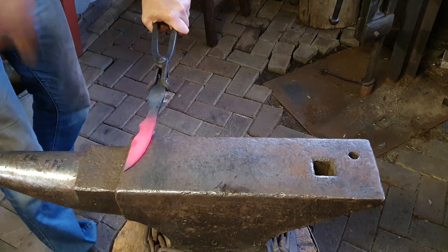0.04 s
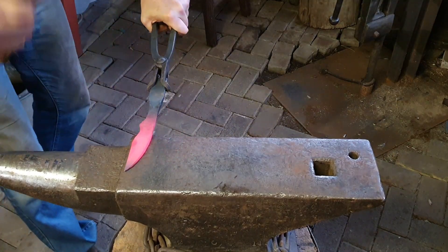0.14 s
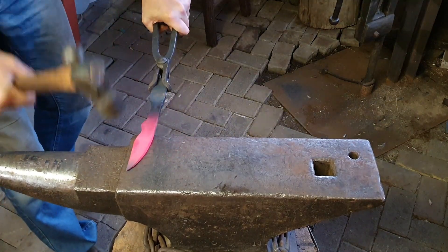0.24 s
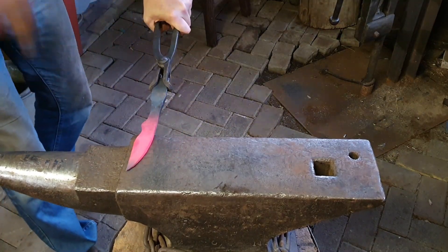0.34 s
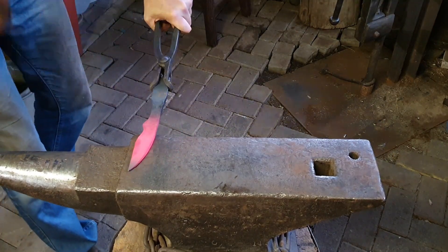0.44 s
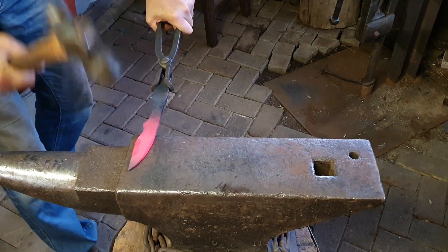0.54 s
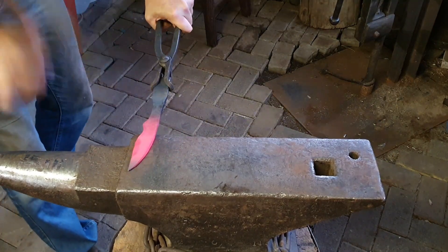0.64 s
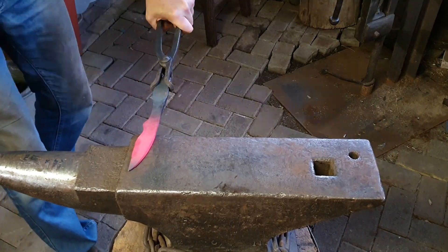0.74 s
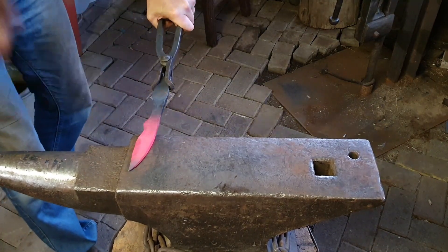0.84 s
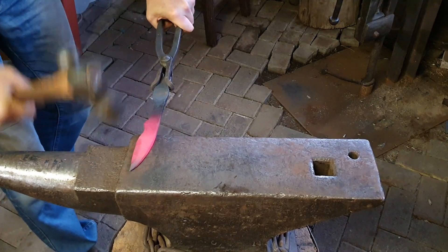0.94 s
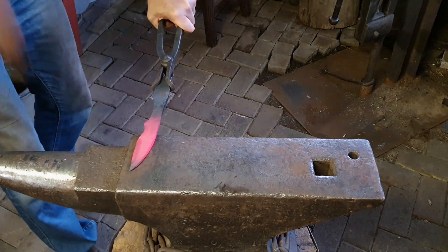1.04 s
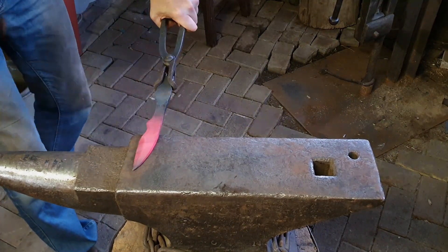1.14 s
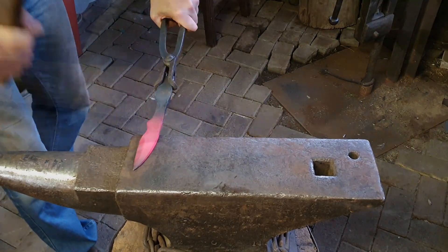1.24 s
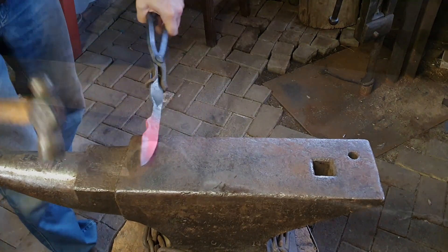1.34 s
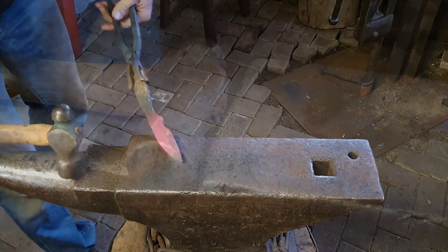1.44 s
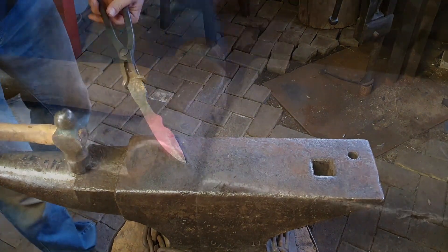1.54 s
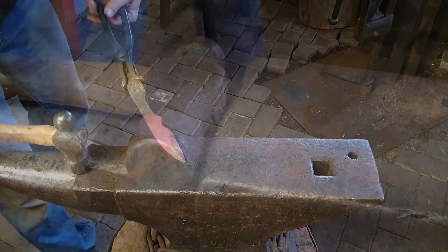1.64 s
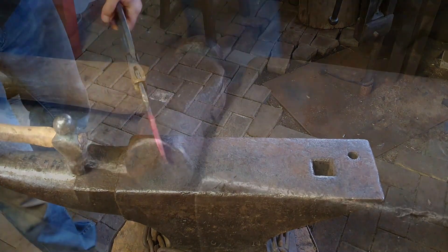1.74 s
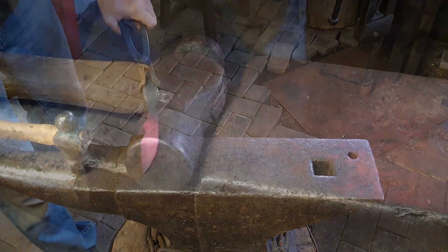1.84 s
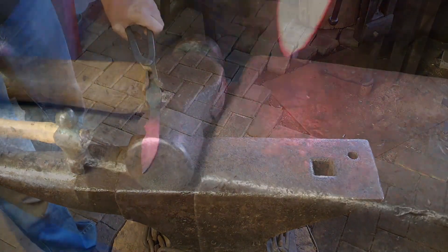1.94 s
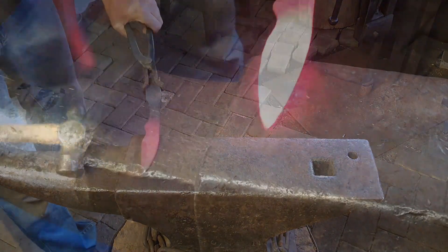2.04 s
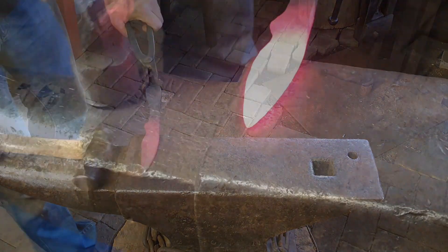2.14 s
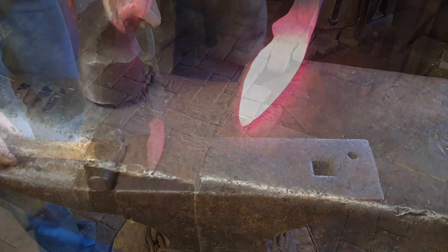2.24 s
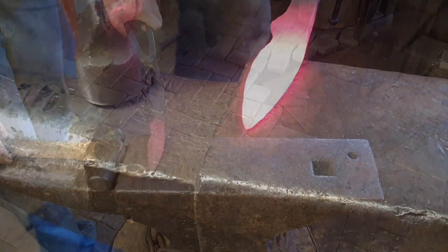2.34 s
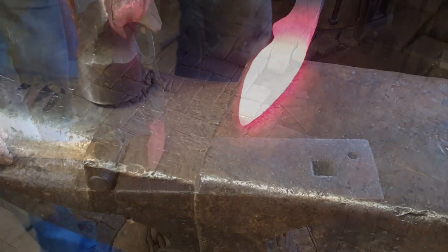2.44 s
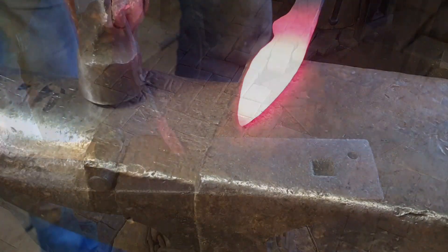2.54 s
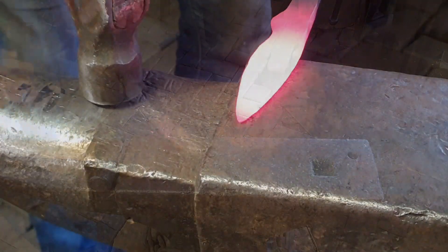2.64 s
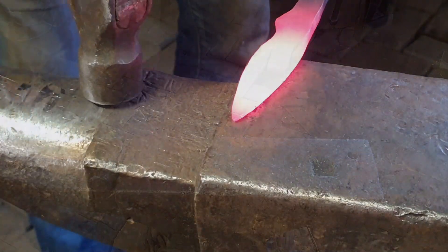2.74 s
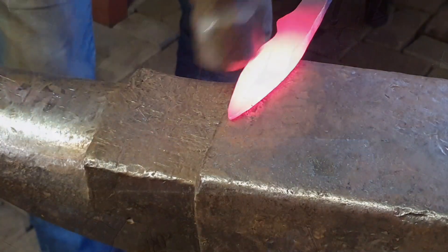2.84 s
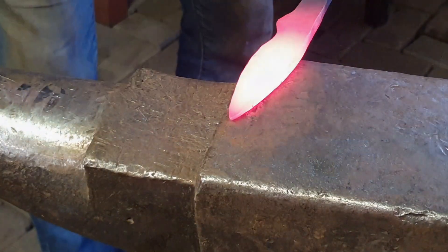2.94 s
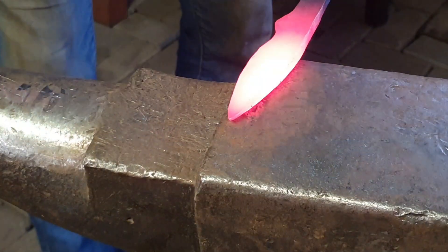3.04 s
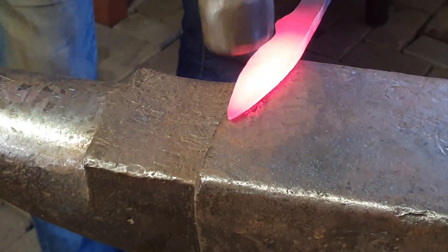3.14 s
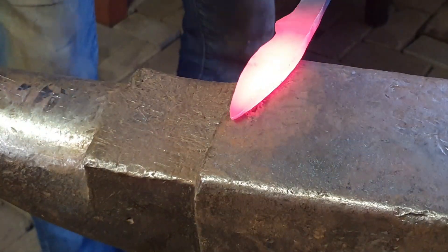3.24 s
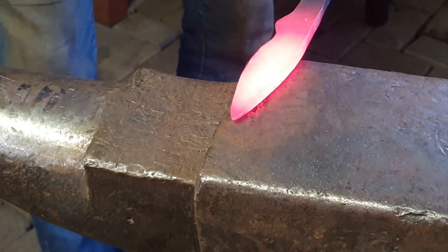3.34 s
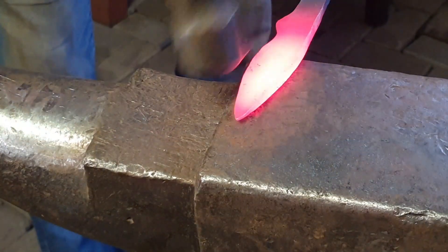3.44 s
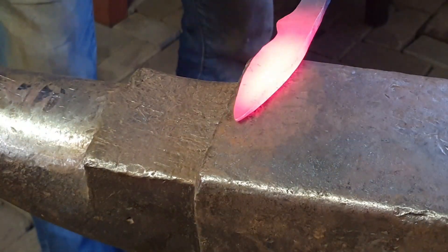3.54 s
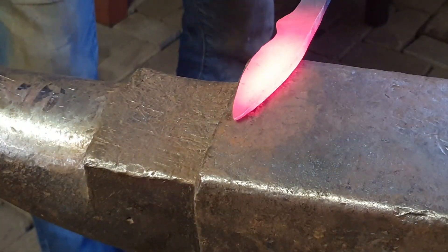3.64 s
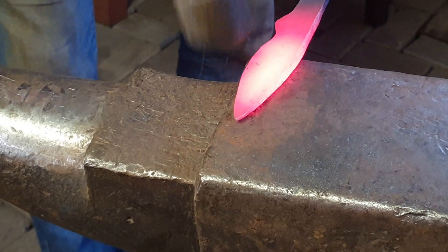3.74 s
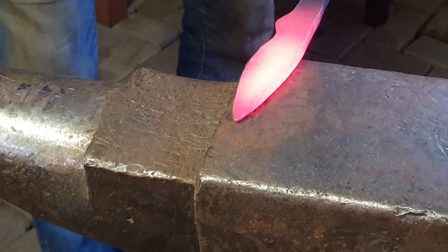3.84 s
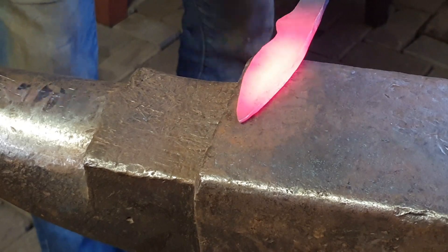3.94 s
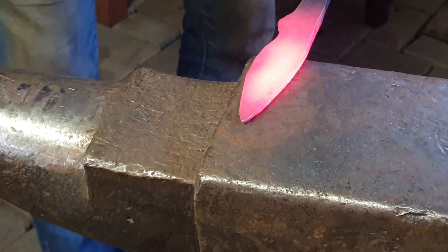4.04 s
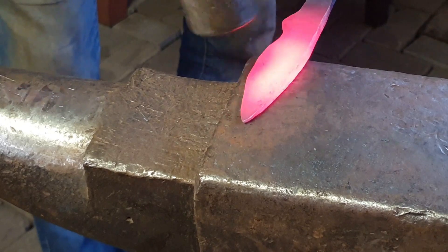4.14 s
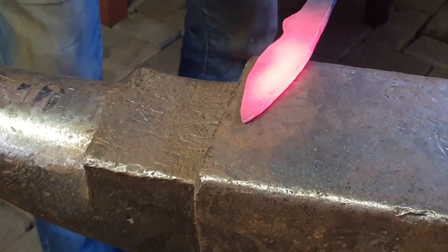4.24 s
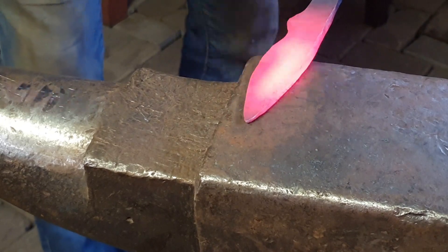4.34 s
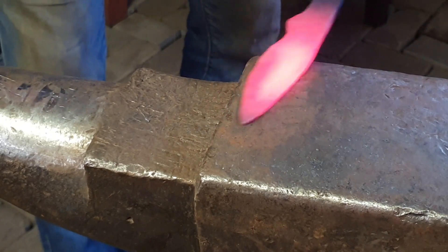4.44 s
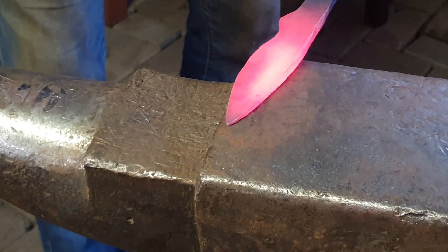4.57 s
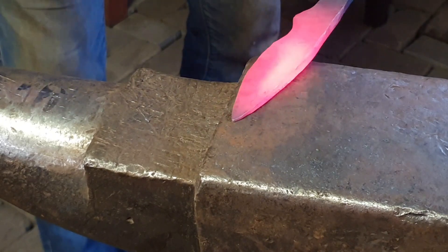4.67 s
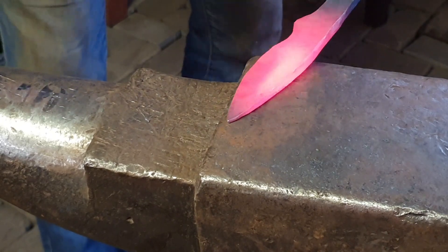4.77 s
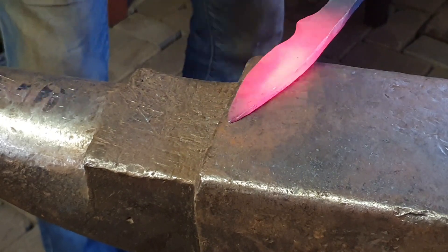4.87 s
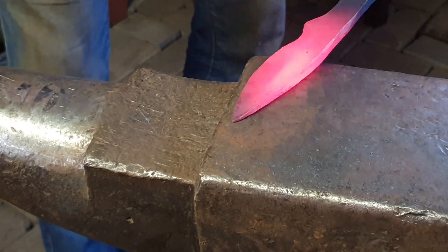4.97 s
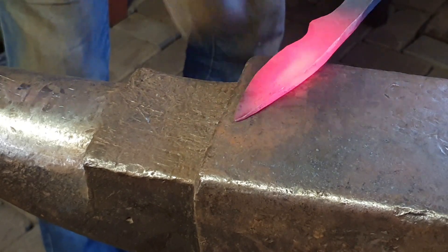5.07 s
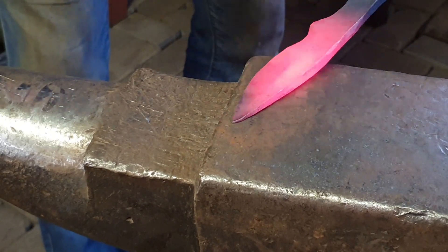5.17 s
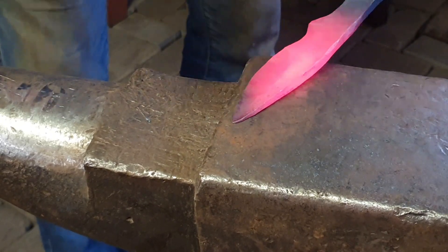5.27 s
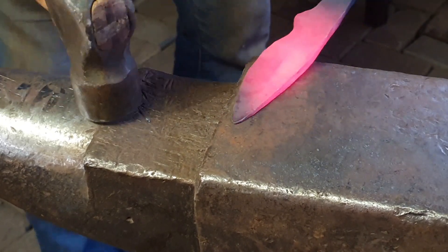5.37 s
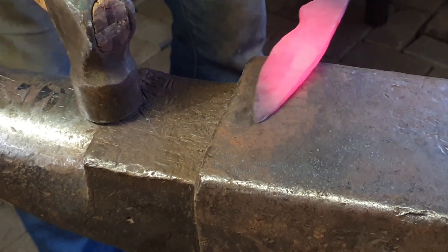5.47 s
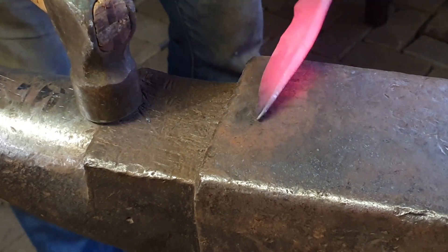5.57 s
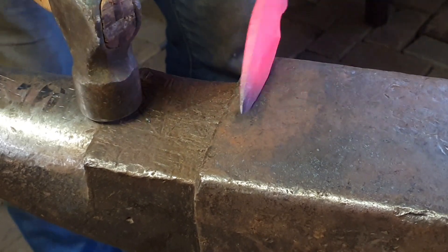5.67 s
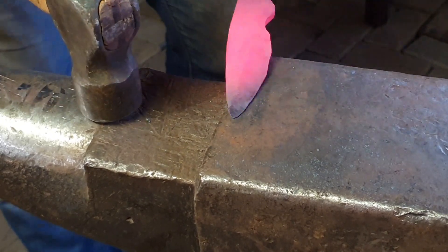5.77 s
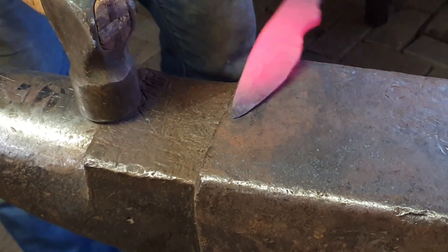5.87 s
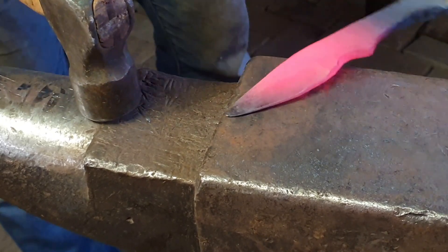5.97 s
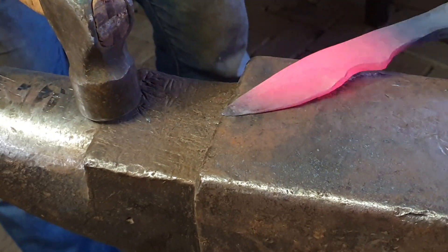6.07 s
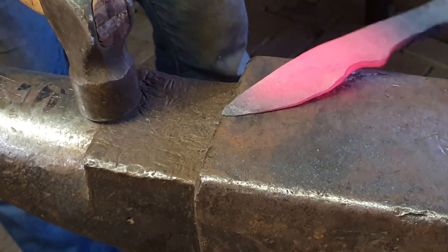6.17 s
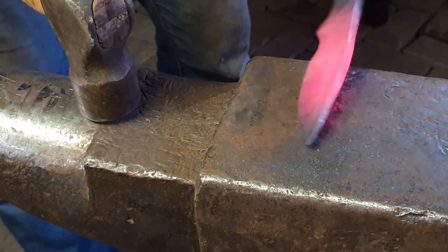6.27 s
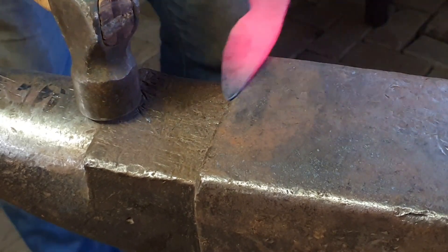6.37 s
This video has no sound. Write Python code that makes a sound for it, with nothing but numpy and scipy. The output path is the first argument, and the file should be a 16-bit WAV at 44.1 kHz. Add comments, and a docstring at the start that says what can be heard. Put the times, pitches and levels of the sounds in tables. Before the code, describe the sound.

A steady forge drone with faint hiss fills a small workshop. In front, fast regular hammer blows clang on an anvil, sharp and quickly damped. They pause for soft metallic taps and clinks as tools are set down, resume in a long burst and a short one, then end with a ringing tap and a very faint one. The stereo pickup is close and automatically levelled, so the fire dips behind the hammering.

```python
"""A forge drones from the start, noise roaring and hissing through narrow resonances over a low rumble.
A smith draws out a hot blade on an anvil in a burst of hammer blows: each swells as noise, cracks as a pulse,
thuds as a band-passed push and leaves decaying sine modes ringing. Hammer and tongs are set down with light
taps and clinks, two more bursts follow close together, then two last taps.
A low hum swells at the end. An automatic gain control ducks the forge under each burst."""
import sys
import numpy as np
from scipy import signal
from scipy.fft import rfft, irfft, next_fast_len
from scipy.io import wavfile
from scipy.ndimage import uniform_filter1d, minimum_filter1d, map_coordinates

SR = 44100
rng = np.random.default_rng(int(sys.argv[2]) if len(sys.argv) > 2 else 0)


def generate_wav(signal):
    """Clip the signal to [-1, 1] and save it as 16-bit WAV at the path in sys.argv[1]."""
    frames = np.transpose(np.atleast_2d(signal))
    scaled = np.clip(frames, -1, 1) * 32767
    pcm = np.round(scaled).astype(np.int16)
    wavfile.write(sys.argv[1], SR, pcm)


N = 282681
TIME = np.arange(N) / SR
LEAD = SR // 20  # samples of a stroke before its contact
AGE = (np.arange(SR // 3) - LEAD) / SR  # seconds since contact

# stereo placing of the forge, positive to the left: pitch_hz [Hz], pan_db [dB left over right]
FORGE_PAN = [(60, 0), (110, 0.5), (200, 1.5), (380, 3), (700, 2.5), (1290, 7), (2380, 2), (4400, 17),
             (8120, 3.5), (15000, -4.5)]
# stereo placing of blows and taps, positive to the left: pitch_hz [Hz], pan_db [dB left over right]
BLOW_PAN = [(200, 2.5), (700, 4), (2400, 4.5), (4400, 6), (6300, 7.5), (7600, 0), (12000, 0.5),
            (15000, 3.5)]
# the anvil's two lasting notes, low then high:
# pitch_hz [Hz], level_db [dB], t60_s [s], pan_db [dB left over right], bloom_db [dB]
NOTES = [(1454, -3, .135, 2.5, 4), (3004, 12.5, .135, .7, 14)]


def amp(db):
    """Decibels to gain."""
    return 10 ** (np.asarray(db) / 20)


def unit(x):
    """Scale to rms 1."""
    return x / np.sqrt(np.mean(x ** 2) + 1e-20)


def along(points, hz):
    """Read a curve of (Hz, value) points on a log frequency axis."""
    point_hz, value = np.transpose(points)
    return np.interp(np.log(hz + 1), np.log(point_hz + 1), value)


def curves(rows):
    """One value per sample for each column after the time."""
    s, *columns = np.transpose(rows)
    return [np.interp(TIME, s, column) for column in columns]


def pan(db):
    """Left and right gains of constant power, left over right by db."""
    gains = amp(np.array([db, -db]).reshape(2, -1) / 2)
    return gains / np.sqrt(np.mean(gains ** 2, axis=0))


def wobble(rate, size):
    """A smooth random curve for each ear, through rate random knots a second."""
    at = np.arange(size) * rate / SR
    knots = rng.standard_normal((2, 512))
    return np.array([map_coordinates(ear, [at], mode="wrap") for ear in knots])


def noise(spectrum, balance, size):
    """Stereo noise of rms 1, alike in the bass and diffuse in the treble."""
    # how alike the two ears are: pitch_hz [Hz], likeness [0-1]
    alike = [(60, .92), (130, 0.57), (290, 0.65), (640, 0.22), (1400, 0.0083)]
    m = next_fast_len(size)
    hz = np.fft.rfftfreq(m, 1 / SR)
    turn = np.arccos(np.clip(along(alike, hz), -1, 1)) / 2
    mid, side = rfft(rng.standard_normal((2, m))) * [np.cos(turn), np.sin(turn)]
    ears = np.array([mid + side, mid - side])
    shaped = ears * amp(along(spectrum, hz)) * pan(along(balance, hz))
    return unit(irfft(shaped, m)[:, :size])


def resonance(hz, width):
    """Noise ringing in one narrow resonance, 12 dB down at width Hz either side."""
    peak = [(max(hz - 4 * width, 1), -80), (hz - width, -12), (hz, 0), (hz + width, -12), (hz + 4 * width, -80)]
    return noise(peak, FORGE_PAN, N)


def workshop(x, wet=0.96, t60=0.17):
    """The workshop's standing waves comb a steady sound into fine fixed peaks."""
    t = np.arange(SR // 4) / SR
    tail = rng.standard_normal((2, len(t))) * amp(-60 * t / t60)
    tail /= np.linalg.norm(tail, axis=1, keepdims=True)
    highpass = signal.butter(2, 600, "highpass", fs=SR, output="sos")
    above = signal.sosfilt(highpass, x)
    return unit(x + wet * signal.fftconvolve(above, tail, axes=1)[:, :N])


def forge():
    """The fire roars steadily through the burner's resonances and hisses."""
    # strength of the fire: start_s [s], level_db [dB over usual]
    fire = [(0, 4.5), (.5, 0.5), (1.9, 1), (2.4, -1.5), (3.2, 0.5), (4.2, 3.5), (5.5, 2.5), (6.41, 1.5)]
    # the broad roar: pitch_hz [Hz], level_db [dB per Hz, relative]
    roar_spectrum = [(76, -50.5), (130, -17.5), (176, -12), (274, -11.5), (376, 0), (500, -11),
                     (553, -22.5), (686, -15.5), (758, -23.5), (967, -24), (1620, -34), (1870, -34.5),
                     (2190, -38.5), (2460, -34.5), (4000, -50.5), (5200, -89.5), (8800, -120)]
    # the treble hiss: pitch_hz [Hz], level_db [dB per Hz, relative]
    hiss_spectrum = [(1500, -0.5), (3000, 4.5), (4300, 7), (5000, 3.5), (6300, 5.5), (7300, -13.5),
                     (8600, -9.5), (9600, 3.5), (11400, -4), (12500, -16), (15500, -26.5)]
    # resonances of the burner: pitch_hz [Hz], width_hz [Hz], level_db [dB over the broad roar]
    flue = [(242.5, 28, -12.5), (357, 90, -5.5), (437.4, 21, -10), (581, 26, -20), (720, 20, -25)]
    roar_db, hiss_db = -40, -73  # at usual strength
    drone_db = -6  # the lowest resonance, over the roar

    fire_db, = curves(fire)
    roar = noise(roar_spectrum, FORGE_PAN, N)
    roar = roar + sum(amp(db) * resonance(hz, width) for hz, width, db in flue)
    roar = workshop(roar) + amp(drone_db) * resonance(hz=185.1, width=30)
    hiss = workshop(noise(hiss_spectrum, FORGE_PAN, N))
    return amp(fire_db) * (amp(roar_db) * roar + amp(hiss_db) * hiss)


def hum(hz=60.28, purity=.93):
    """The fire's low rumble, which gathers into one wavering tone as it swells."""
    # the draught: start_s [s], level_db [dB]
    draught = [(0, -35.5), (.35, -36), (1.25, -35), (1.55, -44.5), (1.9, -40.5), (2.45, -44), (2.7, -40.5),
               (3.4, -40.5), (4.3, -36), (5.55, -42.5), (6.0, -41), (6.37, -23.5)]
    # the rumble: pitch_hz [Hz], level_db [dB per Hz, relative]
    rumble_spectrum = [(13, -46), (22, -17), (48, -6), (65, 5), (83, -1), (118, -12), (129, -30),
                       (140, -20.5), (180, -58), (310, -120)]
    from_db, full_db = -36.5, -29  # draught levels where the tone starts to gather and takes over

    draught_db, = curves(draught)
    gathered = np.clip((draught_db - from_db) / (full_db - from_db), 0, 1)
    share = np.clip(purity, 0, 1) * gathered
    tone = np.sqrt(2) * np.sin(2 * np.pi * hz * TIME + 0.34 * wobble(6.6, N)[0])
    rumble = noise(rumble_spectrum, FORGE_PAN, N)
    # level the noise, so the draught alone sets its slow swells
    power = np.abs(uniform_filter1d(np.mean(rumble ** 2, axis=0), SR // 6))
    rumble /= np.sqrt(power)
    return amp(draught_db) * (np.sqrt(share) * tone + np.sqrt(1 - share) * rumble)


def add(track, s, stroke):
    """Mix a stroke in with its contact at s."""
    start = max(round(s * SR) - LEAD, 0)
    part = track[:, start:start + len(AGE)]
    part += stroke[:, :part.shape[1]]


def swell(rise, t60, curve=2.8):
    """Climbs the last 20 dB in rise seconds, then dies away from the contact on."""
    climb_db = -20 * (np.maximum(-AGE, 0) / rise) ** curve
    decay_db = -60 * np.maximum(AGE, 0) / t60
    return amp(climb_db + decay_db)


def tilt(spectrum, bright_db):
    """Lifts the treble of a contact: the share of bright_db applied grows with frequency."""
    share = [(2500, 0.032), (9000, 0.62)]
    return [(hz, db + bright_db * along(share, hz)) for hz, db in spectrum]


def clash(spectrum, split_hz=5000):
    """Dense bright noise swells up to the contact, then dies away, treble first."""
    dense = noise(spectrum, BLOW_PAN, len(AGE))
    lowpass = signal.butter(2, split_hz, fs=SR, output="sos")
    body = signal.sosfiltfilt(lowpass, dense)
    treble = dense - body
    return body * swell(rise=0.023, t60=0.077, curve=2.7) + treble * swell(rise=0.023, t60=0.061, curve=2.6)


def click(spectrum, size=1024):
    """The causal (minimum-phase) pulse of unit energy that has this spectrum."""
    hz = np.fft.rfftfreq(size, 1 / SR)
    cepstrum = irfft(np.log(amp(along(spectrum, hz))))
    # fold the backward half onto the forward half
    cepstrum[1:size // 2] *= 2
    cepstrum[size // 2 + 1:] = 0
    pulse = irfft(np.exp(rfft(cepstrum)))
    return pulse / np.linalg.norm(pulse)


def crack(spectrum):
    """The hammer face lands: one sharp pulse and a few milliseconds of crushed scale."""
    scale = noise([(100, 0.0088), (15000, 0.0057)], BLOW_PAN, len(AGE))  # nearly white
    force = scale * (AGE >= 0) * amp(-60 * np.abs(AGE) / .014)
    force[:, LEAD] += 2.7 * pan(6.8)[:, 0]
    return signal.fftconvolve(force, click(spectrum)[None], axes=1)[:, :len(AGE)]


def thud(low_hz=250, high_hz=460):
    """The block takes the blow with a damped low push."""
    block = signal.butter(2, [low_hz, high_hz], "bandpass", fs=SR, output="sos")
    push = signal.sosfilt(block, np.exp(-((AGE - .0008) / 0.00045) ** 2))
    return pan(1.2) * push / np.abs(push).max()


def low_tail():
    """A short tail of low noise that starts with the thud and dies away."""
    # the low tail: pitch_hz [Hz], level_db [dB per Hz, relative]
    tail_spectrum = [(90, -13.5), (200, -0.5), (380, 0.5), (600, -5.5), (1200, -32.5)]
    level_db = -13  # beside the thud
    return amp(level_db) * noise(tail_spectrum, BLOW_PAN, len(AGE)) * swell(rise=0.0038, t60=0.092)


def mode(hz, t60, pan_db, rise, blur):
    """One ringing mode; its phase wanders by about blur radians, differently at each ear."""
    phase = rng.uniform(0, 2 * np.pi, (2, 1)) + blur * wobble(97, len(AGE))
    return np.sqrt(2) * pan(pan_db) * swell(rise, t60) * np.sin(2 * np.pi * hz * AGE + phase)


def short_ring(clang_db, ping_db, shimmer_db):
    """The damped modes in three registers; each mode's level varies at random by a few dB."""
    # quickly damped modes of anvil and hammer:
    # pitch_hz [Hz], level_db [dB within its register], t60_s [s], pan_db [dB left over right]
    steel = [(1290, -17, .07, 5), (2484, -15, .07, 6), (2762, -16, .07, 4), (3252, -1, .08, 8),
             (3305, -7, .07, 7), (3390, -10, .06, 7), (4089, -16, .06, 4), (5329, -2, .063, 8),
             (6092, -7, .063, 6), (7357, -17, .07, -2), (8060, -1, .06, 3), (8240, -10, .05, 0),
             (8840, -9, .05, -1)]
    # register corners, pitch_hz [Hz]: clang lies below, ping between, shimmer above
    registers = [4400, 5000, 6400, 7300]
    register_db = list(zip(registers, [clang_db, ping_db, ping_db, shimmer_db]))
    scatter_db = 1.5 * rng.standard_normal(len(steel))
    ring = 0
    for (hz, db, t60, side_db), chance_db in zip(steel, scatter_db):
        level = amp(db + along(register_db, hz) + chance_db)
        ring = ring + level * mode(hz, t60, side_db, rise=0.02, blur=1.0)
    return ring


def note(hz, db, t60, side_db, bloom_db):
    """A lasting note of the anvil: it blooms just after the contact, then wavers as it fades."""
    bloom_s = 0.055  # time constant
    bloom = -bloom_db * np.exp(-np.maximum(AGE, 0) / bloom_s)
    return amp(db + bloom + wobble(20, len(AGE))) * mode(hz, t60, side_db, rise=.022, blur=.15)


def hammer():
    """Full blows: a swelling clash, the brighter crack, the thud and the anvil's ring."""
    # hammer blows, each against a usual one: start_s [s], force_db [dB], bright_db [dB before the tilt],
    # crack_db [dB], ring_db [dB, short ring], low_note_db [dB], high_note_db [dB]
    blows = [(0.058, 1.5, -12.5, 7.5, -5.5, 3.5, -6.5), (0.2164, -1, -3, 6.5, -1.5, 6.5, 0),
             (0.3716, -1.0, 0.5, 2, -4.5, -0.5, 1), (0.518, 2, -0.5, 2.5, 5.5, -5.5, -4.5),
             (0.6627, 3.5, -4, 0.5, 1, 6.5, -5.5), (0.803, 3, -4, -8.5, -1.5, -0.5, -10.5),
             (0.9418, 1.5, -1.5, 2.0, -0.5, 2.5, -9), (1.0789, 3.5, -6, -1, 2.5, 2, -20.5),
             (1.215, 5.5, -8, -3, -5, 1.5, -10.5), (1.353, 0, 3.5, 3.5, 3, -2.5, -1.5),
             (3.2765, -4, 3.5, -1, -8, 10, -8.5), (3.432, -5, -2, -1.5, -1, 10, 1),
             (3.5782, -1.5, 2.5, 7, -1, 3.5, 4), (3.7195, -2, 7.5, 2, 1.5, 7, 1),
             (3.8597, 1.5, 1, 3.0, -7, -0.5, -7.5), (4.001, -2.0, 3, 8, 6.5, 5.5, 7.5),
             (4.144, 1.5, -1.0, 4, -4, 5.5, 6), (4.2806, 0.5, -1, 5, 2.0, -6.5, -1.5),
             (4.4211, 0.5, -2.5, 7.5, 1.5, 0.5, -5), (4.555, 2, 5, 7, 2, -4, -4),
             (4.9543, -2.5, -7.5, 2.5, 3.5, 5, -5), (5.089, 3, -2.5, -2.5, 1.5, -1, -16),
             (5.2138, -2, -1.5, 11.5, 3.5, 6.5, -11), (5.3405, 1.0, 4, -10, 0.5, 3.5, -15)]
    # the clash: pitch_hz [Hz], level_db [dB per Hz, relative]
    clash_spectrum = [(100, -23), (300, -6.5), (700, -7), (1100, -1), (1900, -3), (2650, 1.5), (3750, -4),
                      (4300, 1.5), (5000, -6.5), (6500, -4.5), (7600, -21), (8500, -12.5), (12000, -14.5),
                      (15000, -22)]
    # the hammer face landing: pitch_hz [Hz], level_db [dB per Hz, relative]
    crack_spectrum = [(100, -20.5), (300, -3), (700, -2), (1200, 5), (2500, 0), (4500, -3), (6400, -4),
                      (7600, -16), (8600, -15), (12000, -13), (15000, -22.5)]
    usual_db = -12  # the clash of a usual blow
    crack_over_db, thud_over_db, ring_over_db, note_over_db = 6.5, -0.5, 0.87, -4.5  # over the clash
    ping_over_db, shimmer_db = -2.5, -13  # upper registers of the short ring
    thud_grows, ping_grows = 0.34, .3  # extra dB for each dB of force
    shimmer_grows = .5  # extra dB for each dB of brightness

    out = np.zeros((2, N))
    for s, force_db, bright_db, crack_db, ring_db, *note_db in blows:
        stroke = clash(tilt(clash_spectrum, bright_db - 1.7))
        stroke += amp(crack_over_db + crack_db) * crack(tilt(crack_spectrum, bright_db - 3.5))
        stroke += amp(thud_over_db + thud_grows * force_db) * (thud() + low_tail())
        ping_db = ring_db + ping_over_db + ping_grows * force_db
        stroke += amp(ring_over_db) * short_ring(ring_db, ping_db, shimmer_db + shimmer_grows * bright_db)
        stroke += sum(amp(note_over_db + db) * note(*row) for db, row in zip(note_db, NOTES))
        add(out, s, amp(usual_db + force_db) * stroke)
    return out


def taps():
    """Light grainy contacts; glancing ones are brighter."""
    # light contacts of hammer, tongs and blade: start_s [s], level_db [dB], glancing [0-1],
    # ring_db [dB, short ring over the level], note_db [dB, low note over the level]
    contacts = [(1.532, -36, .05, 2, 6), (1.651, -41.5, 0, -3, 16), (2.018, -53, 0.63, -16, -13),
                (2.115, -46.5, 0.013, -7, 3), (2.132, -43.5, 0, -1.5, -4), (2.165, -47, 0.16, 5.5, 7),
                (2.256, -33.5, 0.045, 2, 2), (2.282, -40.5, 0.03, 7, 10), (2.349, -50, 0.12, -15, -2),
                (5.499, -29, .07, 8.5, 18), (5.819, -55, 0.27, -16, -12)]
    # a square tap: pitch_hz [Hz], level_db [dB per Hz, relative]
    tap_spectrum = [(300, 5.5), (1200, 19), (2700, 15), (4500, 4), (6500, -10), (7600, -32), (9000, -31.5),
                    (15000, -32)]
    # a glancing contact: pitch_hz [Hz], level_db [dB per Hz, relative]
    scrape_spectrum = [(1500, -12), (3500, -2), (6000, 4), (7600, -12), (9500, -5.5), (15000, -19)]

    out = np.zeros((2, N))
    for s, level_db, glancing, ring_db, note_db in contacts:
        glance = np.clip(glancing, 0, 1)
        square = noise(tap_spectrum, BLOW_PAN, len(AGE))
        scrape = noise(scrape_spectrum, BLOW_PAN, len(AGE))
        contact = (1 - glance) * square + glance * scrape
        grit = unit(amp(3.5 * wobble(400, len(AGE))))
        tick = 1 + 1.5 * (AGE >= 0) * np.exp(-np.abs(AGE) / .001)  # accent at the contact
        stroke = contact * grit * tick * swell(rise=0.026, t60=0.12)
        stroke += amp(ring_db) * short_ring(0, ping_db=-29.0, shimmer_db=-31.5)
        stroke += amp(note_db) * note(*NOTES[0])
        add(out, s, amp(level_db) * stroke)
    return out


def tongs():
    """The tongs knock on the anvil and clink with their own few modes."""
    # knocks: start_s [s], level_db [dB]
    clinks = [(2.262, -35), (2.348, -47.5)]
    # modes of the tongs: pitch_hz [Hz], level_db [dB over the knock], t60_s [s]
    tong_modes = [(2610, 3.5, 0.045), (4540, -10, 0.033), (6200, -24, 0.031)]
    out = np.zeros((2, N))
    for s, db in clinks:
        clink = sum(amp(db + level_db) * mode(hz, t60, 2.6, rise=0.0023, blur=0.2)
                    for hz, level_db, t60 in tong_modes)
        add(out, s, clink)
    return out


def scene():
    """Anvil in front, the randomly fluttering forge behind."""
    flutter_db = 1.53 * wobble(12, N)[0]
    return hammer() + taps() + tongs() + amp(flutter_db) * (forge() + hum())


def gain_control(x):
    """Turns down at once for a loud sound, holds, then creeps back up."""
    sense_s, ahead_s, hold_s, release_s = 0.022, 0.012, .25, .11  # averaging, look-ahead, hold, release
    ceiling_db, squeeze = -21.5, 0.94  # removes this share of every dB above the ceiling
    sense, ahead, hold = (max(round(s * SR), 2) for s in (sense_s, ahead_s, hold_s))

    highpass = signal.butter(2, 180, "highpass", fs=SR, output="sos")  # nearly deaf to rumble
    heard = signal.sosfilt(highpass, x)
    power = np.abs(uniform_filter1d(np.mean(heard ** 2, axis=0), sense))
    level_db = 10 * np.log10(power + 1e-12)
    # keep the largest excess from the look-ahead to the end of the hold
    size = ahead + hold
    under_db = np.minimum(ceiling_db - level_db, -1e-6)
    over_db = -minimum_filter1d(under_db, size, origin=hold - size // 2, mode="nearest")
    # let it fall no faster than an exponential release
    over_db = np.exp(np.maximum.accumulate(np.log(over_db) + TIME / release_s) - TIME / release_s)
    return x * amp(-np.clip(squeeze, 0, 1) * uniform_filter1d(over_db, ahead))


def record(dry):
    """The gain control levels the blows, so the forge sinks behind them; a steep low-pass ends the treble."""
    top_hz = 15850
    m = next_fast_len(N + SR // 2)
    edge = np.clip((top_hz - np.fft.rfftfreq(m, 1 / SR)) / 200 + .5, 0, 1)  # 200 Hz slope
    return irfft(rfft(gain_control(dry), m) * edge, m)[:, :N]


dry = scene()
out = record(dry)
generate_wav(out)
```